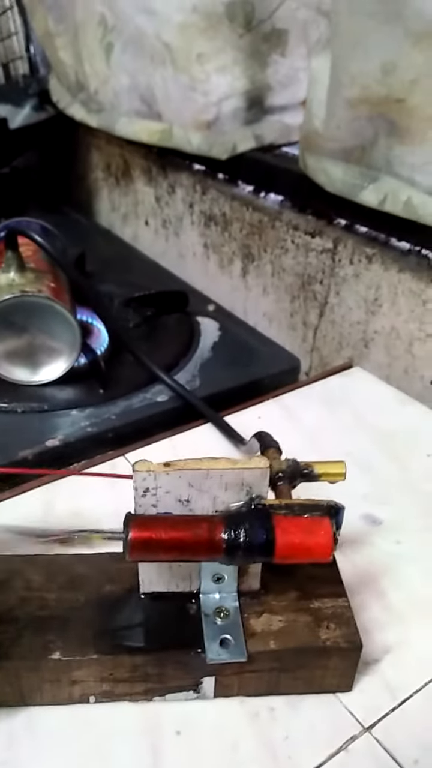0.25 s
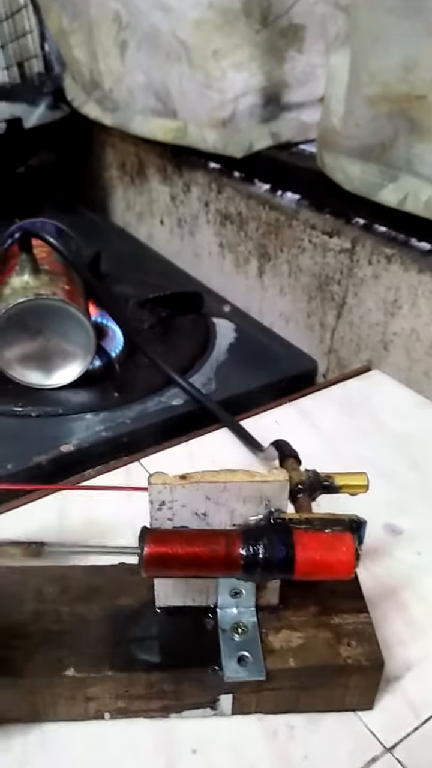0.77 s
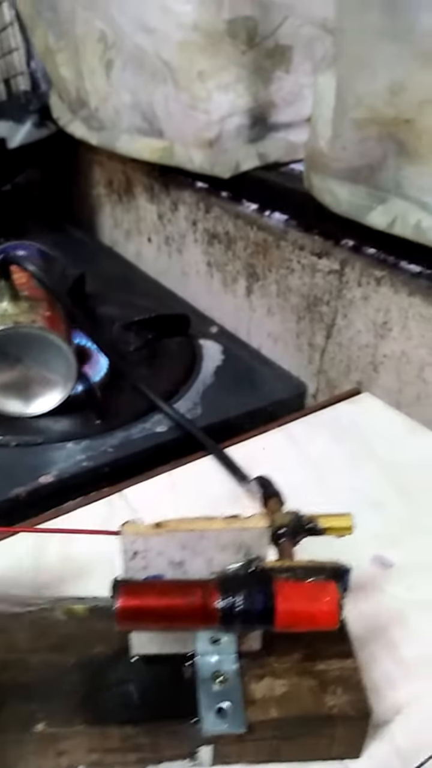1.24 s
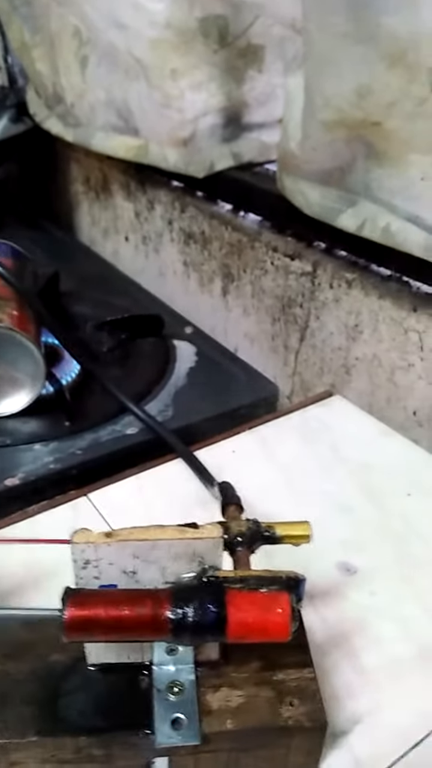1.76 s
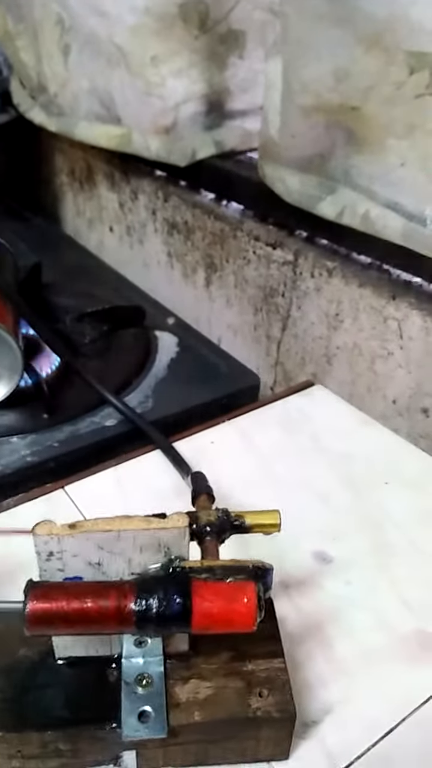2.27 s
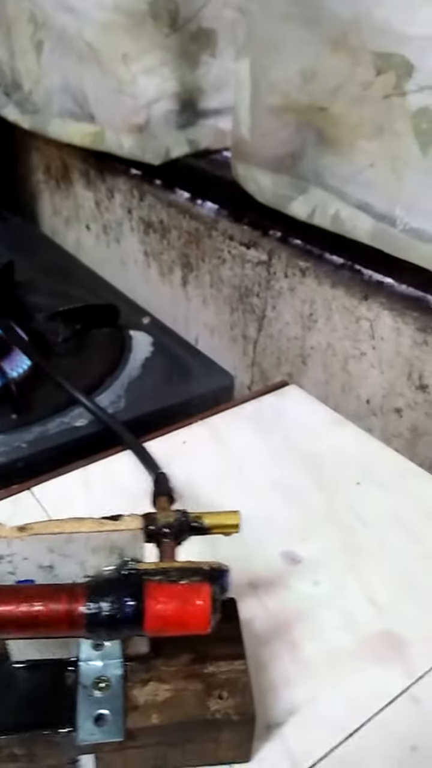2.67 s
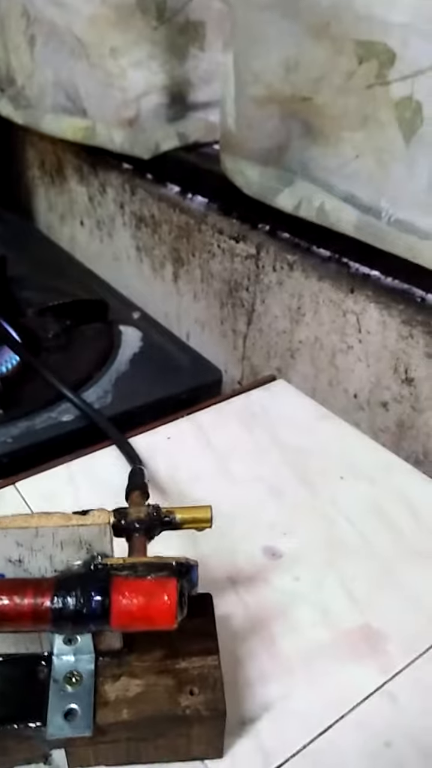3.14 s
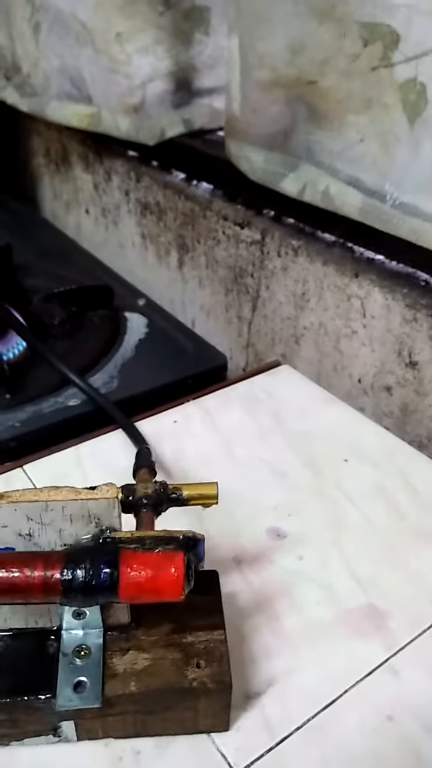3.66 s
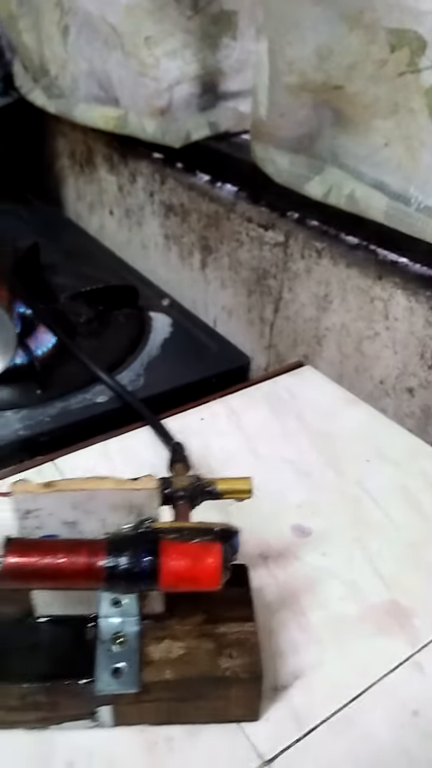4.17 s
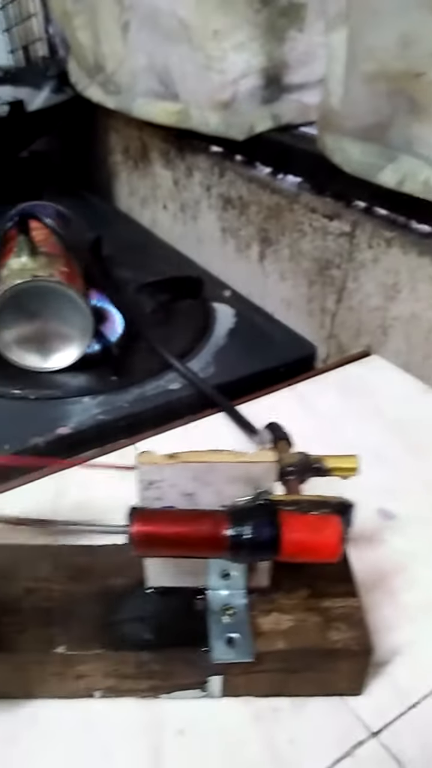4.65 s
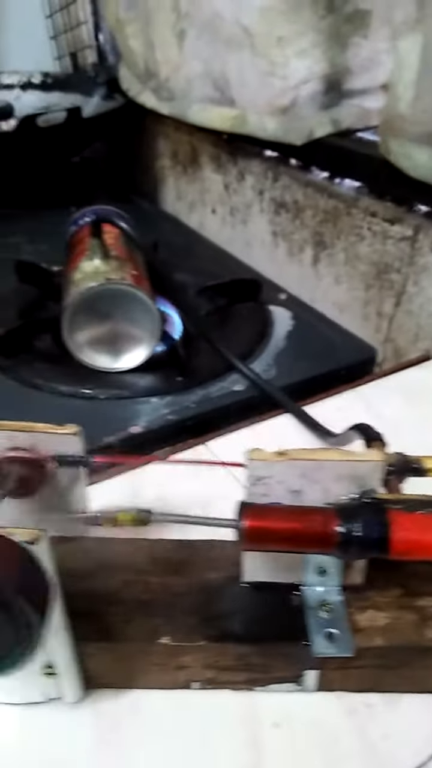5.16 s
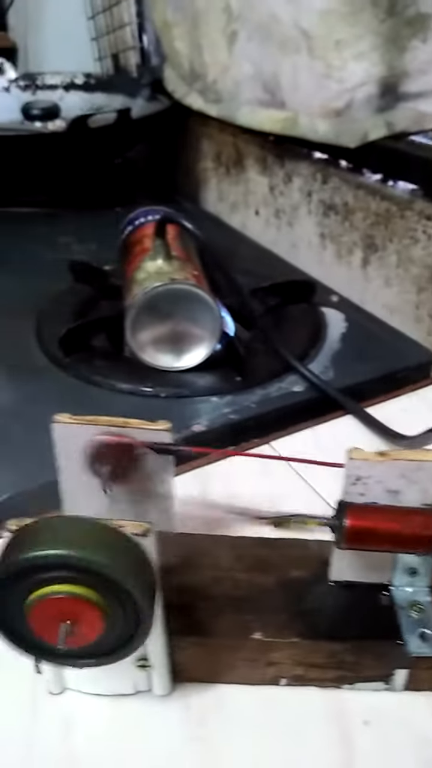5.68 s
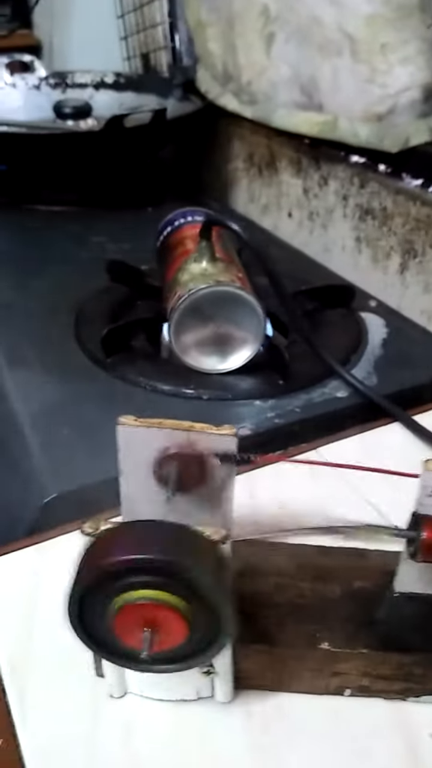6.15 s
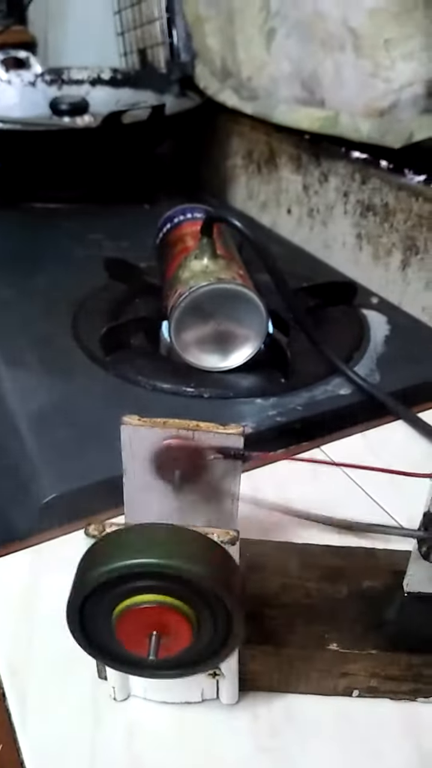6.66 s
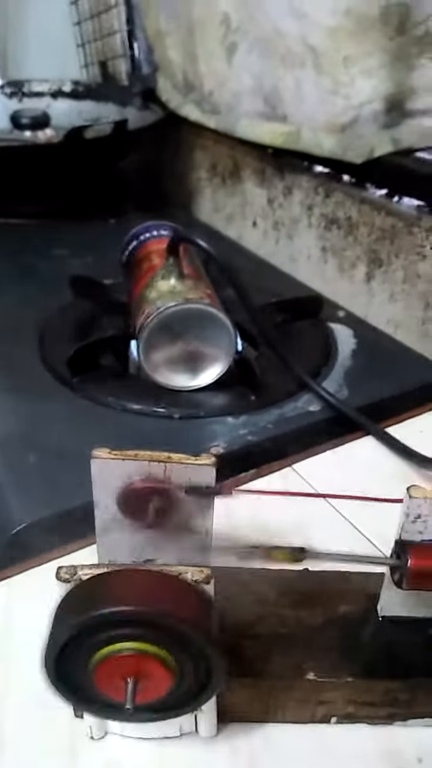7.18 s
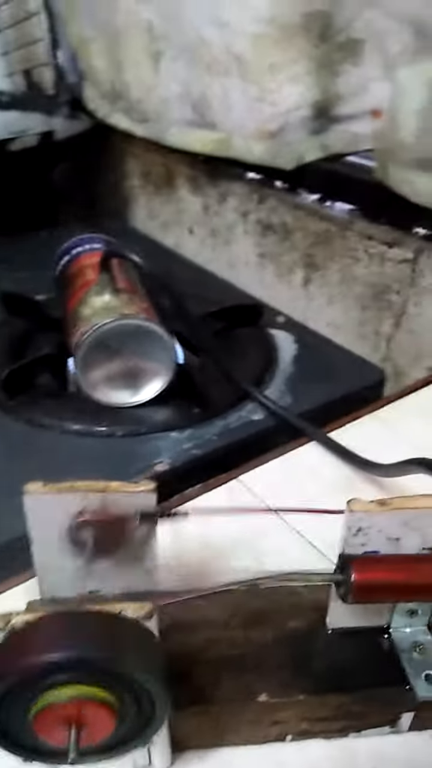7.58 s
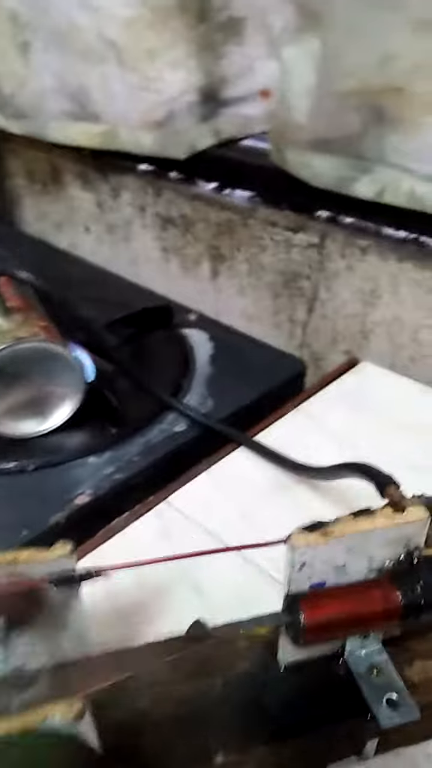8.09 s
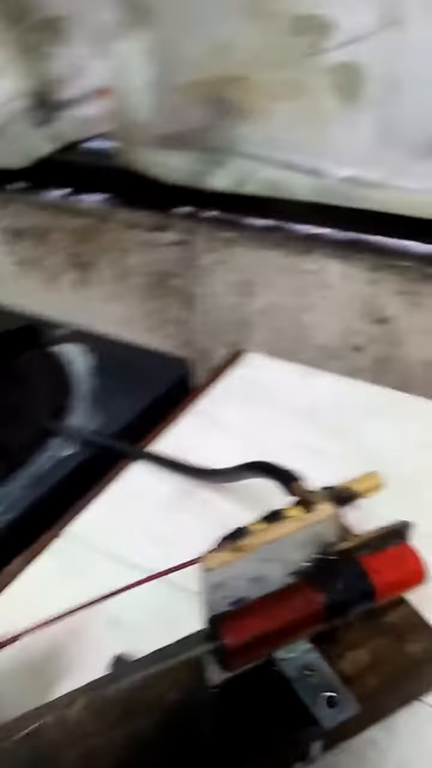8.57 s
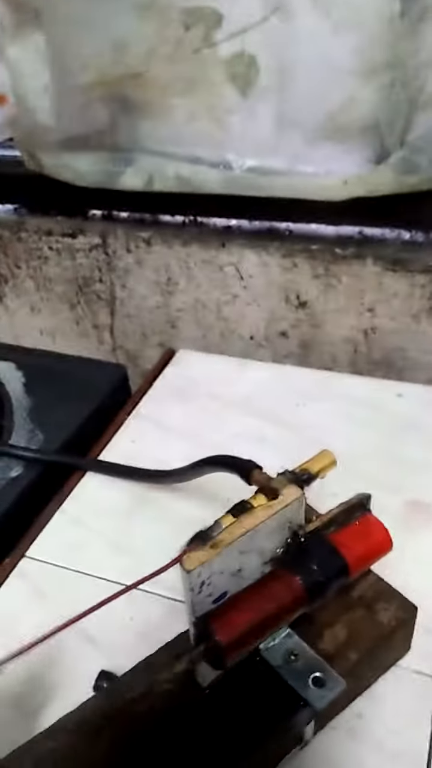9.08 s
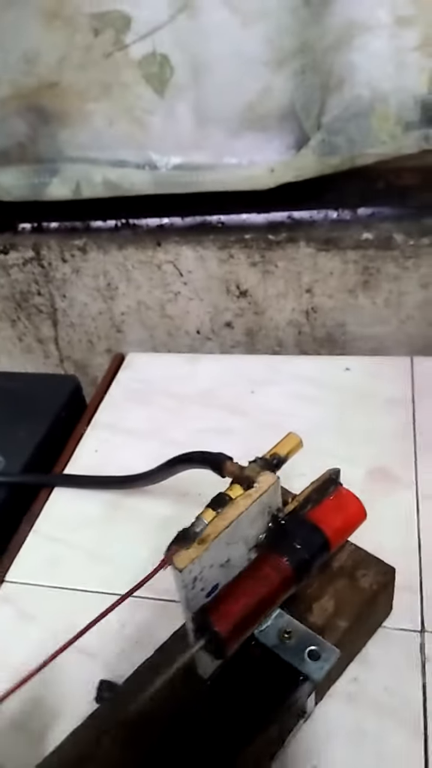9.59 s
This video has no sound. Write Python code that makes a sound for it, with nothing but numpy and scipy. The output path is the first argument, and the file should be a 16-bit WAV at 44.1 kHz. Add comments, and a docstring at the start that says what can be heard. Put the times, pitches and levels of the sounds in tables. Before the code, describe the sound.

A tiny steam engine runs without pause at about nine turns a second. Each turn is a tight cluster of dull thumps, hollow wooden and cylinder knocks, dry rod rattle, a bright brassy ring and a wet spit of exhaust. Steam hisses over it, a gas burner roars softly beneath. The close microphone moves around the engine in a small hard room.

```python
"""A small homemade steam engine on a wooden block runs at about nine turns a second: its slack linkage knocks
as decaying modes of bench, block and cylinder, while rods, fittings and wet exhaust rattle, ring and spit in
shaped noise bursts. Steam hisses as coloured noise, with a thin bright jet while the valve is open.
A gas burner roars softly under the tin boiler, over a faint rumble of low noise.
The microphone wanders round the engine, close by, in a small hard room."""
import sys
import numpy as np
from scipy import signal
from scipy.io import wavfile
from scipy.ndimage import uniform_filter1d, map_coordinates

SR = 44100
rng = np.random.default_rng(int(sys.argv[2]) if len(sys.argv) > 2 else 0)


def log_audio(samples):
    """Write samples as a 16-bit WAV file to the path given in sys.argv[1]."""
    # one column per channel
    frames = np.atleast_2d(samples).T
    # limit to full scale, then quantise
    limited = np.clip(frames, -1, 1)
    pcm = np.round(limited * 32767).astype(np.int16)
    wavfile.write(sys.argv[1], SR, pcm)


N = 433503
TIME = np.arange(N) / SR

# speed of the crank, sagging briefly under friction: (time [s], speed [turns/s])
CRANK_SPEED = [(0, 9.104), (1.45, 9.072), (3.05, 9.093), (3.5, 9.05), (5.2, 9.069), (5.45, 8.96),
               (5.75, 9.027), (7.95, 9.16), (8.5, 9.094), (9.8, 9.088)]
# shoves of the piston on the bench in every turn: (time into turn [s], blow [dB])
PISTON_THUMPS = [(.0065, -22), (0.0224, 7.5), (0.038, 0), (.0470, -4), (0.096, 7.5), (0.101, -5)]
# blows of the slack linkage in every turn: (time into turn [s], block blow [dB], cylinder blow [dB])
LINKAGE_KNOCKS = [(.0035, -12.5, -24), (.0160, -15, 3.5), (.0347, -14, -3), (0.0423, -2.5, 5.5),
                  (0.046, 0, 6.5), (0.0531, -14.5, -1), (.0595, -3, 3), (0.0664, -12, -18),
                  (.0940, -7.5, -26)]
# modes of the bench: (frequency [Hz], level [dB], t60 [s])
BENCH_MODES = [(55, -15, 0.062), (84, -24, 0.13), (126.6, -3, 0.15), (148.6, 1, 0.12), (172.3, 3, 0.17),
               (230, 8, 0.025)]
# modes of the wooden block: (frequency [Hz], level [dB], t60 [s])
BLOCK_MODES = [(296, -15.5, 0.053), (328.5, 0.5, 0.05), (353.7, -7.5, 0.091), (456.8, -1.5, 0.081),
               (509.7, -2.5, 0.047), (590.5, -3, 0.068), (705, 1.5, 0.032)]
# modes of the hollow cylinder: (frequency [Hz], level [dB], t60 [s])
CYLINDER_MODES = [(806.5, -10, 0.069), (840, 5, 0.0097), (872.3, -14, 0.092), (1164, -10.5, 0.039)]
# slow drift of the cylinder's note and strength: (time [s], factor on mode frequencies [1], level [dB])
CYLINDER_DRIFT = [(0, 1, 0.5), (1.5, 0.98, -1.5), (3.3, 1.02, 0), (5.3, 0.97, 0), (8.5, .93, -1),
                  (9.8, 0.92, -2)]
# modes of the crank pin: (frequency [Hz], level [dB], t60 [s])
PIN_MODES = [(3410, 6, 0.017), (3590, -7.5, 0.0073)]
# loudness of the crank pin: (time [s], level [dB])
PIN_LEVEL = [(4.5, -75), (5.1, -53.5), (5.8, -51), (6.4, -62.5), (9.8, -60)]
# bursts of tiny impacts and droplets in every turn:
# (time into turn [s], rise [s], decay [s], rattle [dB], ring [dB], spit [dB])
TURN_BURSTS = [(0.0167, 0.00048, 0.0027, -8.5, 3, -2), (0.03, 0.0054, 0.013, -8, -18.5, -38),
               (.0355, 0.00036, 0.0036, -24.5, -20, -19), (0.0459, 0.00025, 0.0018, -1.5, 6.5, 8),
               (0.0464, 0.0021, 0.0047, -0.5, -7, -3), (0.0516, 0.0018, 0.0072, 3.5, -4, 1.5),
               (0.077, 0.0015, 0.0022, -4.5, -1, -5.5), (0.0906, 0.0017, 0.0033, -0.5, -20, -10),
               (.0953, 0.00055, 0.0056, 3, -27, -7)]
# colour of the loose rods: (frequency [Hz], level [dB])
RATTLE_COLOUR = [(500, -19), (1100, 3.5), (1350, -5), (1560, 0), (1720, 0.5), (1930, 4), (2200, -8),
                 (2900, -7.5), (3450, -3.5), (3900, -6), (9000, -25.5)]
# colour of the brass fittings: (frequency [Hz], level [dB])
RING_COLOUR = [(2500, -36), (3600, -45), (4500, -12.5), (4850, -6.5), (5300, -0.5), (5650, -2), (6000, 3),
               (6300, 2), (6700, 3.5), (7200, -3), (9000, -12), (14000, -48)]
# colour of the wet exhaust: (frequency [Hz], level [dB])
SPIT_COLOUR = [(3000, -57), (6000, -17), (7300, -9), (8400, 4), (9400, 1.5), (10200, 0), (11200, -9.5),
               (12500, -14), (14500, -22)]
# how strongly fittings ring and exhaust spits: (time [s], ring [dB], spit [dB])
CLATTER_TREND = [(0, 0.5, 0.5), (2.2, -0.5, 1), (4.5, -1.5, -0.5), (5.0, 0.5, 1), (5.5, 2, -7),
                 (5.95, -0.5, -5), (6.1, 2, 0), (7.3, 3, 0.5), (8.4, 1.5, 5.5), (9.8, -1.5, 1)]
# slugs of condensed water that make single turns louder: (time [s], extra level [dB])
WATER_SLUGS = [(2.99, 5.5), (3.10, 3), (3.98, 3.5), (5.08, 3.5), (7.51, 1)]
# colour of the steam leak: (frequency [Hz], level [dB])
HISS_COLOUR = [(1900, -6.5), (2700, -25), (5000, -14.5), (7000, -6), (9300, 7.5), (11000, -1), (14500, -11)]
# the leak follows the pressure in the cylinder: (time into turn [s], level [dB])
LEAK_PRESSURE = [(0, -3.5), (.004, 1), (.036, 4), (.040, -0.5), (.108, -8.5)]
# reach of each part to the moving microphone:
# (time [s], bench [dB], block [dB], rattle [dB], hiss [dB])
MIC_REACH = [(0, -1, 0.9, 0, 5), (0.7, 6, -1.5, 1, 1.5), (1.5, 6, 0, 1, 2), (2.2, 6, 0.5, 0.5, 3.5),
             (3, 8.5, 2.5, -0.5, 3.5), (3.7, 5, -0.5, -0.1, 4.5), (4.4, 4.5, 1.9, -2.1, 3),
             (5.1, -2, 0, 4, 3), (5.7, -1, -5.5, 2, 2), (6.4, 3.5, -4, 0.8, 1.5), (7.2, 1.5, -5, 0.5, 3.2),
             (7.9, 0.5, -2.7, 7, 1), (8.6, 5, 0, 8.5, 4), (9.2, 4, -2, 8.5, 4.5), (9.8, 5.5, -0.5, 4.5, 5)]
# treble beamed to each side: (frequency [Hz], cylinder end [dB], flywheel end [dB], top [dB])
SIDE_BEAMS = [(1055, -5, -1, -12.5), (1250, -9, 2.5, -5), (2100, 3, 1, -9), (2550, 1.5, 6.5, -11),
              (3070, -4, -0.5, -11), (3430, -5, 4.5, -4), (4240, 3, 0.5, 2.5), (4480, 4.5, -0.5, 4.5),
              (5380, -3, 6.5, 4.5), (5900, -6.5, 2, -4), (7080, 5.5, 0.5, -2.5), (7870, 0.5, 3, 2.5),
              (8960, -1, -3, 1.5), (11900, 0.5, -1, -2)]
# side the microphone faces: (time [s], position [0 cylinder end, 1 flywheel end, 2 top])
MIC_SIDE = [(0, 0.73), (1.5, 0.13), (2.4, 0.067), (4.3, 0.09), (5.0, 1.52), (7.3, 1.24), (8.3, 2.22),
            (9.1, 2.3), (9.8, 1.63)]
# colour of the gas burner: (frequency [Hz], density [dB per Hz])
BURNER_COLOUR = [(20, -42), (48, -21), (80, -10), (125, 0), (400, -2), (800, 0.5), (1200, -14.5),
                 (2000, -11), (2800, -21), (9000, -17), (14000, -35)]
# level of the flame's roar at the moving microphone: (time [s], level [dB])
ROAR_LEVEL = [(0, -48.5), (2.8, -48), (4.4, -47.5), (5.5, -51), (7.8, -49.5), (9.8, -48)]
# level of the deep rumble: (time [s], level [dB])
RUMBLE_LEVEL = [(0, -58), (.6, -63), (1.2, -69), (2.5, -67), (3.2, -79), (5.2, -75), (7.4, -82), (9.8, -80)]
# decay of the room: (frequency [Hz], t60 [s])
ROOM_DECAY = [(100, 0.44), (500, 0.33), (2000, 0.57), (15000, 0.29)]
# stereo width: (frequency [Hz], side against mid [dB])
STEREO_WIDTH = [(3500, -69), (4400, -32.5), (6300, -13.5), (14000, -8)]


def linkage():
    """Piston and crank thump the bench, knock the block and ring the hollow cylinder."""
    when, block_db, cylinder_db = np.transpose(LINKAGE_KNOCKS)
    # the block rocks on the tiles, which detunes it
    seating = 1 + 0.025 * wander(per_s=7)
    cylinder_tune = curve(CYLINDER_DRIFT, column=1)
    bench = struck(BENCH_MODES, *np.transpose(PISTON_THUMPS), slack_s=0.00035, uneven_db=0.5,
                   swell_s=0.0034, nodes_db=0.94)
    block = struck(BLOCK_MODES, when, block_db, slack_s=0.00035, uneven_db=3.0,
                   swell_s=0.002, nodes_db=1.17, tune=seating)
    cylinder = struck(CYLINDER_MODES, when, cylinder_db, slack_s=0.00022, uneven_db=2.1,
                      swell_s=0.0015, nodes_db=1.0, tune=cylinder_tune)
    bench = bench * gain_of(-57 + curve(MIC_REACH, column=1))
    block = block * gain_of(-45 + curve(MIC_REACH, column=2))
    cylinder = cylinder * gain_of(-45 + curve(CYLINDER_DRIFT, column=2))
    return bench + block + cylinder


def crank_pin(when_s=0.0945):
    """The loose pin clinks on two short modes as the rod reverses."""
    clink = struck(PIN_MODES, np.array([when_s]), 0, slack_s=0.0004, uneven_db=2.5,
                   swell_s=0.0009, nodes_db=1)
    return clink * gain_of(curve(PIN_LEVEL, column=1))


def clatter():
    """Loose rods rattle, the brass fittings ring and wet steam spits from the exhaust."""
    *_, rattle_db, ring_db, spit_db = np.transpose(TURN_BURSTS)
    ring_db = ring_db + turn_levels(column=1, uneven_db=1.0)
    spit_db = spit_db + turn_levels(column=2, uneven_db=1.5)
    rattle = bursts(RATTLE_COLOUR, rattle_db, slack_s=0.0012, uneven_db=1.2, patch_db=8.0)
    ring = bursts(RING_COLOUR, ring_db, slack_s=0.00025, uneven_db=0.55, patch_db=5)
    spit = bursts(SPIT_COLOUR, spit_db, slack_s=0.00042, uneven_db=1.0, patch_db=3.5)
    rattle = rattle * gain_of(-48 + curve(MIC_REACH, column=3))
    return rattle + gain_of(-45.5) * ring + gain_of(-42.5) * spit


def steam(flutter_db=3.5, opens_s=0.0068, shuts_s=0.04, edge_s=0.0013):
    """Steam leaks all the time, and a thin bright jet escapes while the valve is open."""
    start = turn_starts()
    this_turn = np.maximum(np.searchsorted(start, TIME) - 1, 0)
    since = TIME - start[this_turn]
    leak_db = np.interp(since, *np.transpose(LEAK_PRESSURE))
    flutter = evened(uniform_filter1d(rng.standard_normal(N), size=120))
    leak = colour(rng.standard_normal(N) * gain_of(leak_db + flutter_db * flutter), HISS_COLOUR)
    opening = 1 + np.tanh((since - opens_s) / edge_s)
    closing = 1 - np.tanh((since - shuts_s) / edge_s)
    thin = signal.butter(3, 11000, "high", fs=SR, output="sos")
    jet = opening * closing * signal.sosfilt(thin, mottled(rng.standard_normal(N), patch_db=13.0))
    hiss = gain_of(-48.5) * evened(leak) + gain_of(-52) * evened(jet)
    return hiss * gain_of(curve(MIC_REACH, column=4))


def burner(flicker_db=2.0):
    """The gas flame roars softly under the boiler: coloured noise with a flickering level."""
    flicker = evened(uniform_filter1d(rng.standard_normal(N), size=3000))
    roar = evened(colour(rng.standard_normal(N), BURNER_COLOUR) * gain_of(flicker_db * flicker))
    return roar * gain_of(curve(ROAR_LEVEL, column=1))


def rumble(low_hz=42, high_hz=68):
    """A deep, faint band of noise that mostly fades in the first few seconds."""
    band = signal.butter(3, [low_hz, high_hz], "band", fs=SR, output="sos")
    return evened(signal.sosfilt(band, rng.standard_normal(N))) * gain_of(curve(RUMBLE_LEVEL, column=1))


def beamed(x):
    """The treble changes colour as the microphone moves round the engine."""
    return sum(share * colour(x, SIDE_BEAMS, column=k + 1) for k, share in enumerate(nearness()))


def room(x, gap_s=0.0046):
    """Dense reflections from tiles and walls, different on each side, dying at a rate set by frequency."""
    wet = 0
    for share in nearness():
        hz, t, z = signal.stft(rng.standard_normal(SR // 2), SR, nperseg=256)
        decay = gain_of(-60 * t / read(ROOM_DECAY, hz)[:, None])
        tail = signal.istft(z * decay, SR, nperseg=256)[1]
        tail *= TIME[:len(tail)] > gap_s  # silence before the first reflection
        tail = tail / np.linalg.norm(tail)
        wet = wet + np.sqrt(share) * signal.oaconvolve(x, tail)[:N]
    return wet


def nearness():
    """How far the microphone is on each of the three sides; the shares sum to one."""
    side = np.clip(curve(MIC_SIDE, column=1), 0, 2)
    return np.maximum(1 - abs(side - np.arange(3)[:, None]), 0)


def turn_starts():
    """The start of every full turn, found by adding up the crank's speed."""
    first_turn_s = 0.0155
    turns = np.cumsum(curve(CRANK_SPEED, column=1)) / SR
    turns = turns - np.interp(first_turn_s, TIME, turns)
    return np.interp(np.arange(int(turns[-1]) + 1), turns, TIME)


def turn_levels(column, uneven_db):
    """Strength of each turn in dB: a slow trend, chance, and more when a slug of water passes."""
    start = turn_starts()
    trend_db = np.interp(start, TIME, curve(CLATTER_TREND, column))
    db = trend_db + uneven_db * rng.standard_normal(len(start))
    for s, extra_db in WATER_SLUGS:
        db[np.argmin(abs(start - s))] += extra_db
    return db[:, None]


def struck(modes, when, blow_db, slack_s, uneven_db, swell_s, nodes_db, tune=1):
    """The blows of every turn, never quite alike, ring the modes of one part."""
    start = turn_starts()
    late, harder = rng.standard_normal((2, len(start), len(when)))
    blow_times = start[:, None] + when + slack_s * late
    blows = clicks(blow_times, gain_of(blow_db + uneven_db * harder))
    clock = np.cumsum(tune * np.ones(N)) / SR  # runs faster when tuned up
    ring = 0
    for hz, db, t60 in modes:
        carrier = np.exp(2j * np.pi * hz * clock)
        # each mode takes a moment to build up, then dies away
        poles = np.exp(-np.array([np.log(1000) / t60, 1 / swell_s]) / SR)
        mode = (carrier * signal.lfilter([1], np.poly(poles), blows * carrier.conj())).imag
        # and is heard more or less as the microphone passes its nodes
        ring = ring + gain_of(db + nodes_db * wander(per_s=1.944)) * mode
    low_cut = signal.butter(2, modes[0][0] * 0.75, "high", fs=SR, output="sos")
    return evened(signal.sosfilt(low_cut, ring))


def bursts(points, burst_db, slack_s, uneven_db, patch_db):
    """Showers of tiny impacts, as clumpy noise, that swell and die within milliseconds."""
    start, t, power = turn_starts(), TIME[:SR // 10], np.zeros(N)
    burst_db = burst_db + np.zeros((len(start), 1))  # one row a turn
    for (s, rise, decay, *_), db in zip(TURN_BURSTS, burst_db.T):
        late, harder = rng.standard_normal((2, len(start)))
        shape = (1 - np.exp(-(t / rise) ** 2)) * np.exp(-t / decay)
        train = clicks(start + s + slack_s * late, gain_of(db + uneven_db * harder) ** 2)
        power += signal.oaconvolve(train, (shape / shape.max()) ** 2)[:N]
    grain = evened(uniform_filter1d(rng.standard_normal(N), size=30))
    clumps = gain_of(2.9 * np.tanh(grain))
    shower = np.sqrt(abs(power)) * clumps * rng.standard_normal(N)
    return evened(colour(mottled(shower, patch_db), points))


def mottled(x, patch_db):
    """Every contact lands on another spot and favours other overtones."""
    z = signal.stft(x, nperseg=256, noverlap=192)[2]
    patches = uniform_filter1d(rng.standard_normal(z.shape), size=3, axis=0)  # across frequency
    patches = uniform_filter1d(patches, size=12, axis=1)  # across time
    z = z * gain_of(patch_db * np.tanh(evened(patches)))
    return signal.istft(z, nperseg=256, noverlap=192)[1][:N]


def clicks(times, sizes):
    """Single-sample blows at the given times."""
    at = np.maximum(np.round(times * SR).astype(int), 0)
    return np.bincount(at.ravel(), sizes.ravel(), N)[:N]


def wander(per_s):
    """A smooth random curve of unit RMS through per_s random knots a second."""
    knots = rng.standard_normal(256)
    path = map_coordinates(knots, [TIME[::100] * per_s], order=3, mode="wrap")
    return evened(path).repeat(100)[:N]


def colour(x, points, column=1):
    """Causal minimum-phase filter with the given spectrum: peaks ring on after a click."""
    hz = abs(np.fft.fftfreq(4096, 1 / SR))
    log_gain = np.log(gain_of(read(points, hz, column)))
    taps = np.fft.ifft(np.exp(np.conj(signal.hilbert(log_gain)))).real
    return signal.oaconvolve(x, taps[:len(taps) // 2])[:N]


def read(points, hz, column=1):
    """One column of a spectrum table, joined on a log-frequency axis."""
    points = np.array(points, float)
    return np.interp(np.log(hz + 1), np.log(points[:, 0] + 1), points[:, column])


def curve(rows, column):
    """One column of a time table at every sample."""
    rows = np.array(rows, float)
    return np.interp(TIME, rows[:, 0], rows[:, column])


def gain_of(db):
    """Decibels to amplitude factor."""
    return 10 ** (np.asarray(db) / 20)


def evened(x):
    """Scale to unit RMS."""
    return x / np.sqrt(np.mean(x ** 2) + 1e-20)


def scene():
    """Engine, flame and room; only the treble differs between the ears."""
    knocks = linkage() + crank_pin()
    treble = beamed(clatter() + steam())
    reflections = room(gain_of(-10.5) * knocks + gain_of(-13.0) * treble)
    mid = knocks + treble + reflections + burner() + rumble()
    # a second, independent draw of the treble spreads it between the ears
    side = colour(beamed(clatter() + steam()), STEREO_WIDTH)
    side = gain_of(-5.0) * side + gain_of(-1.0) * room(side)
    return np.array([mid + side, mid - side])


def record(dry, edge_hz=14400):
    """The recorder's band limit: a steep linear-phase low-pass."""
    taps = signal.firwin(401, edge_hz, window=("kaiser", 8), fs=SR)
    return signal.oaconvolve(dry, taps[None], "same")


dry = scene()
out = record(dry)
log_audio(out)
```